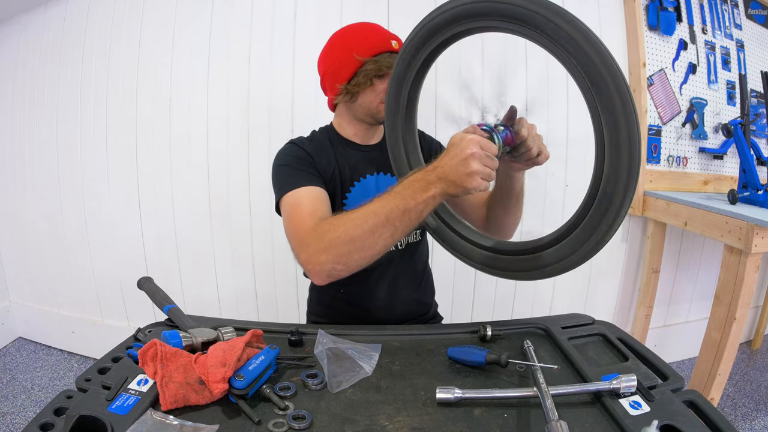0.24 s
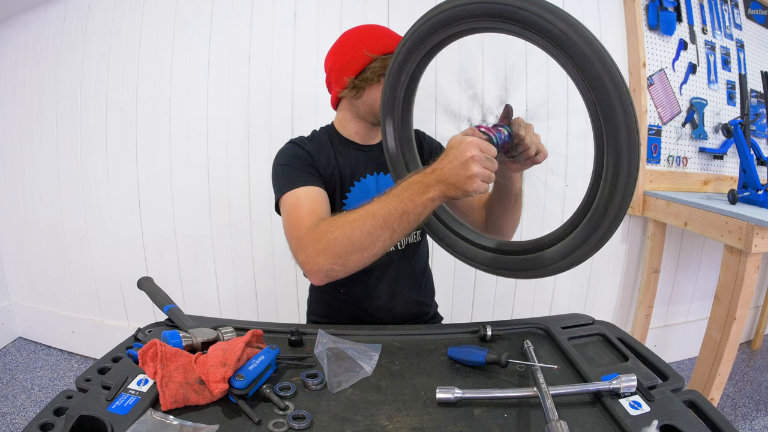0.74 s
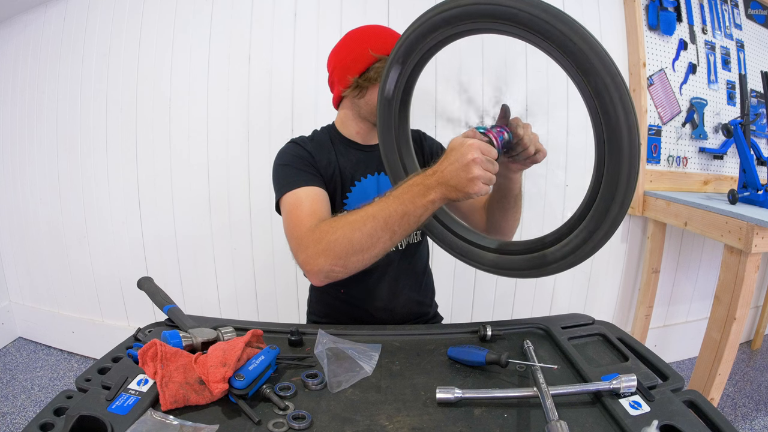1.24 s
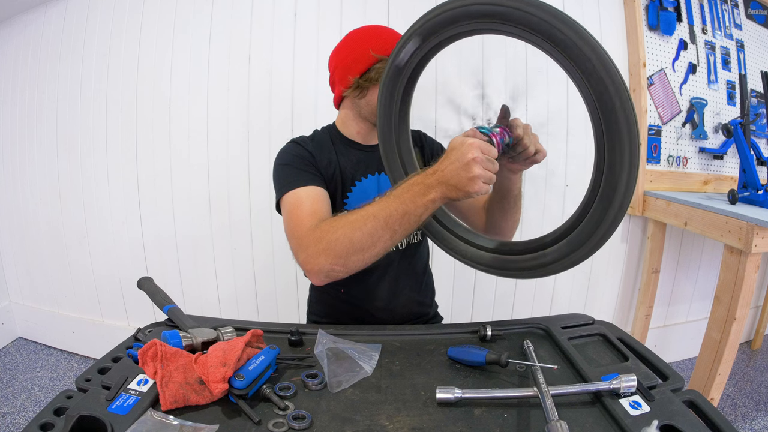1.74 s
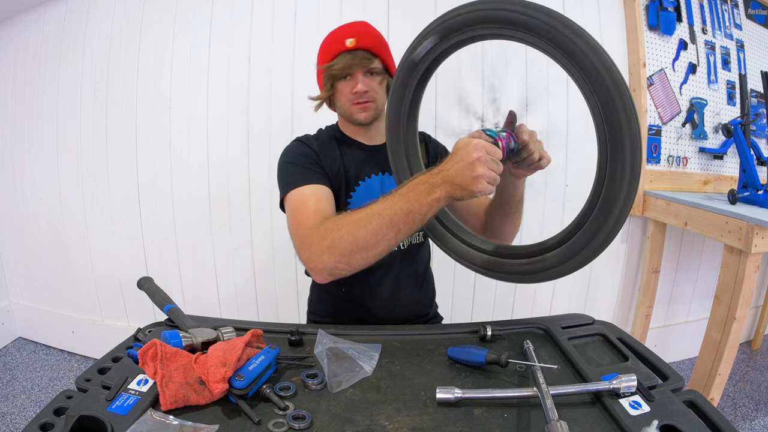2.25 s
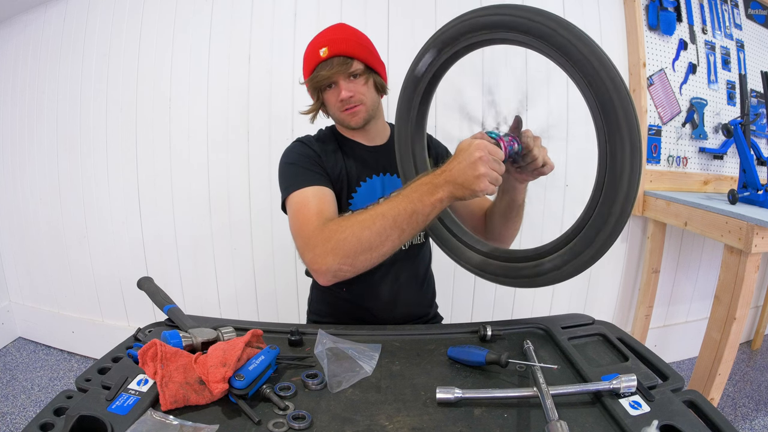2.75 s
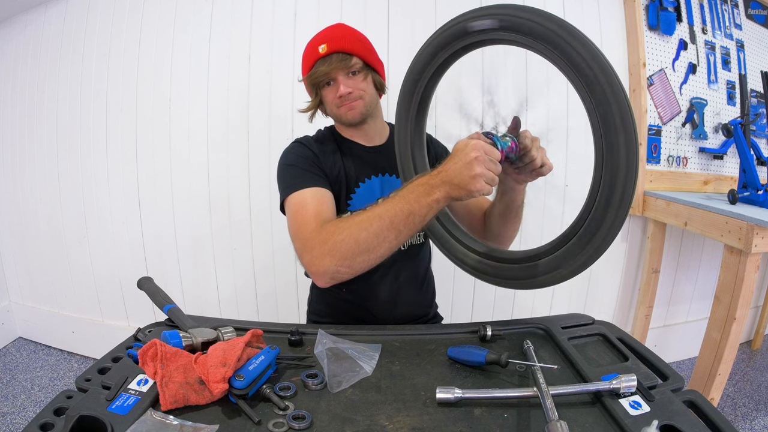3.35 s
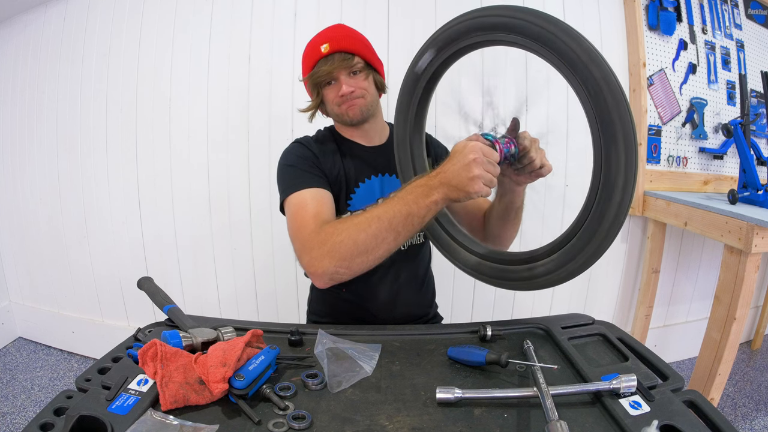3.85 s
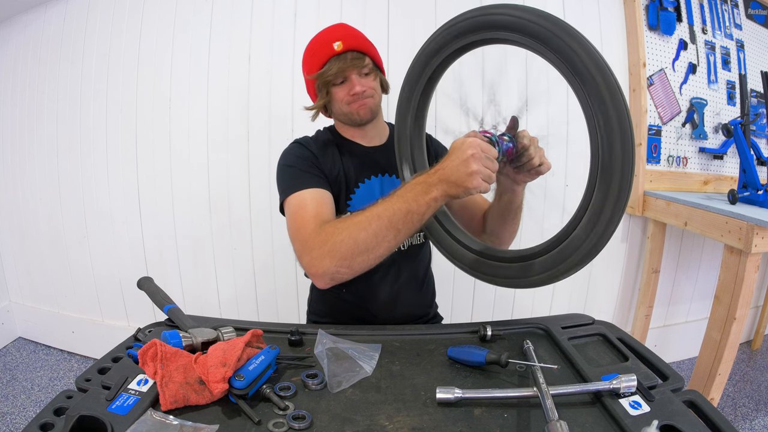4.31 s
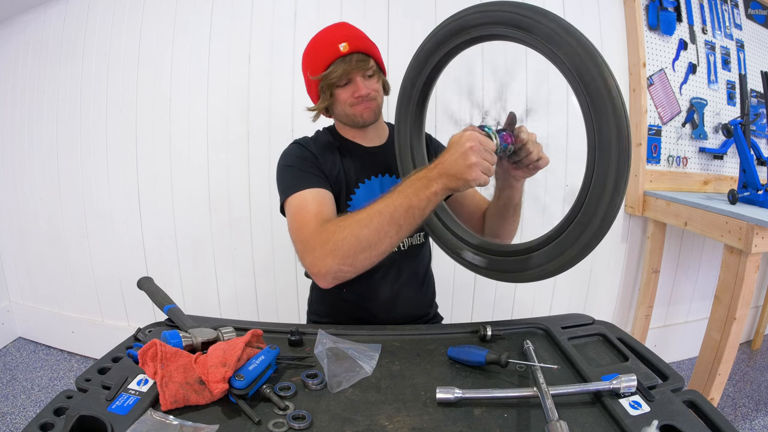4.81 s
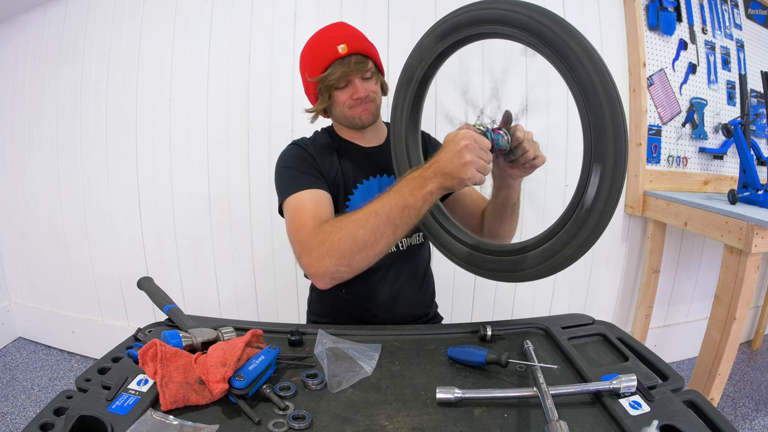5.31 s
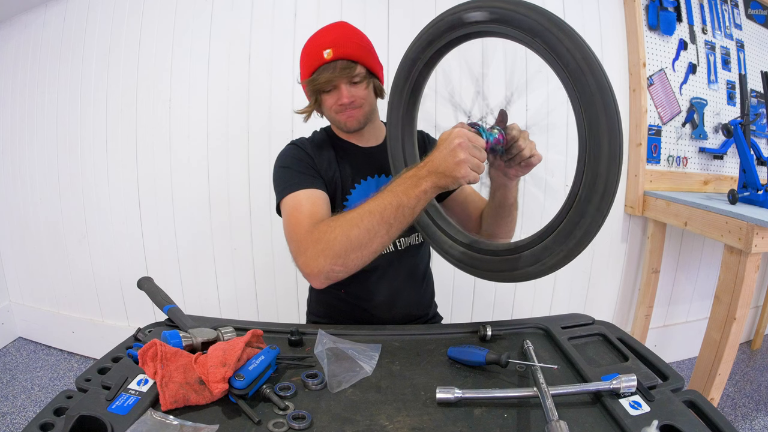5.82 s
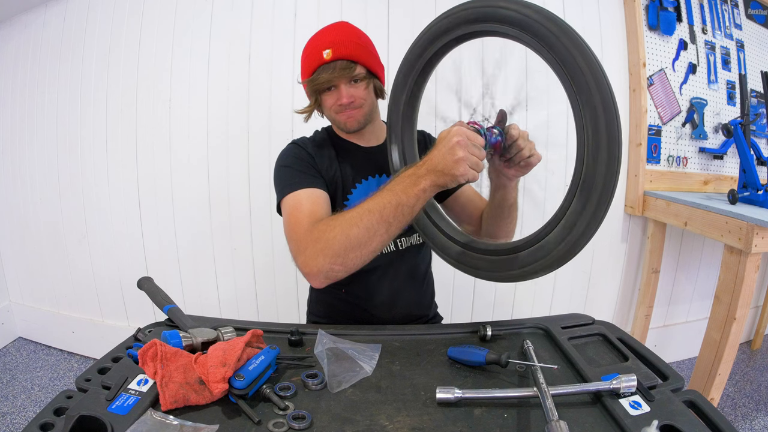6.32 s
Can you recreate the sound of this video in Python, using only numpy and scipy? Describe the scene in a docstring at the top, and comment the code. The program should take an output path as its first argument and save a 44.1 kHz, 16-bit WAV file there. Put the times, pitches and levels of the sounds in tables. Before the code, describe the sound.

A freewheeling bicycle hub buzzes brightly, its very fast ratchet clicks slowly dropping in pitch as the wheel slows.

```python
"""A bright metallic buzz, slowly falling in pitch: a bicycle wheel freewheels, held by its axle.
The hub's pawls snap over a ring of 68 teeth, so fast that the clicks fuse into a tone, and
friction steadily lowers their rate. Every snap excites resonances of hub shell, spokes and rim,
which swell as the wheel turns. A small workshop adds short reverberation, faint air and hum."""
import sys
import numpy as np
from scipy import signal
from scipy.fft import rfft, irfft, next_fast_len
from scipy.io import wavfile
from scipy.ndimage import uniform_filter1d

SR = 44100
rng = np.random.default_rng(int(sys.argv[2]) if len(sys.argv) > 2 else 0)


def put_to_file(sound):
    """Save the sound as 16-bit audio at rate SR, in the file named by the first command-line argument."""
    columns = np.atleast_2d(sound).T  # one column per channel
    safe = np.clip(columns, -1, 1)
    whole_steps = np.round(safe * 32767)
    wavfile.write(sys.argv[1], SR, whole_steps.astype(np.int16))


N = 289704
TIME = np.arange(N) / SR
FREQS = np.fft.rfftfreq(N, 1 / SR)
TEETH = 68


def gain_of(db):
    """Amplitude ratio of a level: a factor of ten per 20 dB."""
    return 10 ** (np.asarray(db) / 20)


def unit_rms(x):
    """Normalisation to a mean power of 1."""
    return x / np.sqrt(np.mean(x ** 2) + 1e-20)


def levelled(x, size=6000):
    """Division by the running rms steadies the level and keeps the quick flutter."""
    power = uniform_filter1d(uniform_filter1d(x ** 2, size), size // 2)
    return x / np.sqrt(power + 1e-20)


def curve_at(points, hz):
    """Interpolation of a table on a logarithmic frequency axis."""
    f, value = np.transpose(points)
    return np.interp(np.log(hz + 1), np.log(f + 1), value)


def drift(rate_hz):
    """Low-passed noise: a slow random fluctuation of rms 1."""
    return unit_rms(irfft(rfft(rng.standard_normal(N)) / (1 + (FREQS / rate_hz) ** 4), N))


def lobes(turns, crest, count):
    """Directivity of a rotating source: count maxima per turn, one at the share crest of the turn."""
    return np.cos(2 * np.pi * count * (turns - crest))


def tooth_rate(start_hz=159.4, slowing_hz_per_s=10.5):
    """Constant friction torque: the number of teeth passing per second falls linearly."""
    return start_hz - slowing_hz_per_s * TIME


def background(air_db=-63.5):
    """Superposition of a line spectrum, the electrical hum, and a continuous one, the room air."""
    # mains harmonics: f/Hz, rms level/dB
    harmonics = [(60, -79), (120, -85), (360, -73)]
    # spectral density of the still air: f/Hz, relative level/dB
    air_spectrum = [(20, -7.5), (30, -4.5), (45, -19), (80, -3.5), (130, -12), (220, -3.5), (300, -9),
                    (600, -3.5), (4000, -25.5)]
    hum = sum(np.sqrt(2) * gain_of(db) * np.sin(2 * np.pi * (hz * TIME + rng.random()))
              for hz, db in harmonics)
    air = irfft(rfft(rng.standard_normal(N)) * gain_of(curve_at(air_spectrum, FREQS)), N)
    return hum + gain_of(air_db) * unit_rms(air)


def room_tail(gap_s=0.003, size=16384):
    """Impulse response of a diffuse field: noise decaying exponentially, each band at its own rate."""
    # reverberation time of the workshop: f/Hz, T60/s
    decay_times = [(300, 0.74), (2000, 0.55), (7000, 0.38), (15000, 1)]
    # reverberation relative to the direct sound: f/Hz, level/dB
    wet_levels = [(400, -3), (900, 4), (2200, 3), (4500, 3), (8000, 6.5), (15000, 7.5)]
    hz, t, noise = signal.stft(rng.standard_normal(size), SR, nperseg=256)
    fade = gain_of(-60 * t / curve_at(decay_times, hz)[:, None])
    energy = size * np.mean(fade ** 2, axis=1, keepdims=True)
    fade *= gain_of(curve_at(wet_levels, hz))[:, None] / np.sqrt(energy)
    tail = signal.istft(noise * fade, SR, nperseg=256)[1]
    return np.concatenate([np.zeros(round(gap_s * SR)), tail])


def workshop(direct, turns, orders=3):
    """Rotating directivity: the wheel's lobes sweep the walls, so the reflections vary through a turn."""
    wet = np.zeros(N)
    for order in range(1, orders + 1):
        for facing in (np.cos, np.sin):
            tail = room_tail()
            beam = direct * facing(2 * np.pi * order * turns)
            beam = np.pad(beam, (len(tail) - 1, 0), "wrap")  # the room is already ringing
            wet += signal.oaconvolve(beam, tail, "valid")
    return direct + wet / np.sqrt(orders)


def thin_rings(drive, turns, crest=0.76):
    """Resonance: lightly damped modes sing as harmonics slide through them, and throb as they turn."""
    # narrow modes of hub, rim and spokes: f/Hz, width/Hz, rms level/dB, swells per turn, depth (0-1)
    modes = [(647.4, 9.7, -57.5, 2, 0.2), (796, 7.9, -52, 1, .4), (848.3, 13, -51, 1, .4),
             (1644, 20, -58, 3, .3), (2274, 18, -45, 1, 0.45), (4130, 39, -52.5, 2, 0.3),
             (5028, 58, -47.5, 4, 0.5), (12100, 150, -55, 2, .5), (13830, 140, -54, 3, .5)]
    out = np.zeros(N)
    for hz, width, db, swells, depth in modes:
        ring = signal.lfilter(*signal.iirpeak(hz, hz / width, SR), drive)
        throb = 1 + depth * lobes(turns, crest, swells)
        out += gain_of(db) * unit_rms(ring * throb)
    return out


def radiate(body, turns, waver_hz=6.5):
    """Amplitude modulation: each part radiates one band, whose level follows speed and wheel angle."""
    # rows for spokes, rim, hub shell, pawls: level at mid speed/dB, rise per doubling of speed/dB,
    # swell/dB, its crest/turn, ripple/dB, its crest/turn, random waver/dB
    parts = [(-55, 5.5, 0, 0.4, 1, 0.13, 1.7), (-46.5, 0.5, 2, 0.78, 0.5, 0.22, 1.5),
             (-30, 4, 0, 1, 0.14, 0.22, 0.66), (-26.5, 3.5, .2, 0.86, 0.16, 0.098, 0.36)]
    # brief swells of the hub shell's ring: t/s, half length/s, level/dB
    shell_swells = [(0.449, 0.058, 1.5), (.83, .04, 1), (3.13, 0.023, 0.5), (3.874, 0.018, 0.5),
                    (5.268, 0.018, 3)]
    lowpasses = [1 / (1 + (FREQS / edge_hz) ** 40) for edge_hz in (730, 950, 2800)]
    bands = np.diff(lowpasses, axis=0, prepend=0, append=1)
    spectrum = rfft(body)
    doublings = np.log2(tooth_rate() / tooth_rate().mean())
    shell_db = sum(db * np.exp(-((TIME - at) / half_s) ** 2) for at, half_s, db in shell_swells)
    out = np.zeros(N)
    for band, part, brief_db in zip(bands, parts, (0, 0, shell_db, 0)):
        level_db, speed_db, swell_db, swell_crest, ripple_db, ripple_crest, waver_db = part
        turning_db = swell_db * lobes(turns, swell_crest, count=1)
        turning_db += ripple_db * lobes(turns, ripple_crest, count=4)
        db = level_db + speed_db * doublings + turning_db + waver_db * drift(waver_hz) + brief_db
        out += levelled(irfft(spectrum * band, N)) * gain_of(db)
    return out


def speed_colour(x, centre_hz, width_hz, power):
    """Power law of excitation: faster snaps drive one band harder, so it thins as the wheel slows."""
    band = 1 / (1 + (2 * (FREQS - centre_hz) / width_hz) ** 8)
    gain = (tooth_rate() / tooth_rate().mean()) ** power
    return x + irfft(rfft(x) * band, N) * (gain - 1)


def wheel_body(snaps, size=4096):
    """Free vibration: the metal rings after each snap, as a minimum-phase filter of its resonances."""
    # spectral envelope of one snap: f/Hz, relative level/dB
    envelope = [(60, -58.5), (320, -43.5), (520, -33.5), (750, -30.5), (1000, -21), (1400, -10),
                (1800, -4.5), (2150, 4), (2750, -5), (3500, -5), (5600, -10.5), (8000, -7), (10600, -18),
                (15600, -18)]
    # resonances of rim, spokes and hub: f/Hz, width/Hz, level above the envelope/dB
    modes = [(365, 110, 8.5), (426.5, 46, 2.5), (604, 124, 11.5), (832, 200, 21), (1087, 188, 9),
             (1496, 55, 3.5), (1593, 160, 4.5), (2053, 144, 5), (2382, 335, 7), (3013, 130, 5.5),
             (3370, 180, 3.5), (3645, 63, 4.5), (4140, 38, -4), (4870, 180, 2), (7064, 310, 6.5),
             (9150, 180, 4), (10046, 330, 3), (11730, 1830, 5), (13900, 203, 0)]
    hz = abs(np.fft.fftfreq(size, 1 / SR))
    peaks_db = sum(db / (1 + (2 * (hz - f) / width) ** 2) for f, width, db in modes)
    log_gain = np.log(gain_of(curve_at(envelope, hz) + peaks_db))
    response = np.exp(np.conj(signal.hilbert(log_gain)))  # the Hilbert transform supplies the phase
    ring = np.fft.ifft(response).real
    return signal.oaconvolve(snaps, ring[:size // 2])[:N]


def pawl(teeth, place, knock_db, wear_s=30e-6, jitter_s=28e-6, uneven_db=1.5, chatter_s=0.0027):
    """Impact excitation: a pawl drops off each tooth with a snap, then chatters briefly on the steel."""
    # weight of the chatter against the clean knock: f/Hz, level/dB
    chatter_levels = [(300, -34), (900, -15.5), (1500, -9), (2300, -7), (3500, 1), (7000, 2), (15000, 14)]
    tooth = np.arange(int(teeth[-1]) + 1)
    wear = rng.standard_normal(TEETH)[tooth % TEETH]  # the same faults return with every turn
    jitter, force = rng.standard_normal((N // 200, 2))[tooth].T
    onset_s = np.interp(tooth + place, teeth, TIME) + jitter_s * jitter + wear_s * wear
    onsets = np.clip(np.round(onset_s * SR).astype(int), 0, N - 1)
    knocks = np.bincount(onsets, gain_of(uneven_db * force), N)
    decays = signal.lfilter([1], [1, -np.exp(-1 / (chatter_s * SR))], knocks)
    chatter = decays * rng.standard_normal(N)
    # the clean knock carries the low harmonics, the chatter takes over in the treble
    size = next_fast_len(N)
    ratio = gain_of(curve_at(chatter_levels, np.fft.rfftfreq(size, 1 / SR)))
    blend = gain_of(knock_db) * rfft(unit_rms(knocks), size) + ratio * rfft(unit_rms(chatter), size)
    return irfft(blend / np.hypot(1, ratio), size)[:N]


def scene():
    """Source and filter: the pawls drive the wheel's resonances in the room, alike in both channels."""
    # snaps within one tooth: place/tooth, relative level of the blow/dB, weight of its clean knock/dB
    pawls = [(0.019, 0.5, 0), (.145, -2, -15.5), (0.354, 2.5, -17.5), (0.728, -5, -6)]
    wobble = 0.012 * drift(rate_hz=7)  # the hand-held axle wavers by a small share of a tooth
    teeth = np.cumsum(tooth_rate()) / SR + wobble
    turns = teeth / TEETH
    direct = [gain_of(blow_db) * pawl(teeth, place, knock_db) for place, blow_db, knock_db in pawls]
    snaps = sum(workshop(train, turns) for train in direct)
    body = wheel_body(snaps)
    body = speed_colour(body, centre_hz=1760, width_hz=1040, power=1.0)  # lower modes of the hub shell
    body = speed_colour(body, centre_hz=14100, width_hz=2700, power=0.19)  # the edge of the snaps
    buzz = radiate(body, turns) + thin_rings(sum(direct), turns)
    return np.tile(buzz + background(), (2, 1))


def record(dry, edge_hz=15750):
    """Band limiting: a steep linear-phase low-pass removes the highest treble."""
    lowpass = signal.firwin(1023, edge_hz, window=("kaiser", 9), fs=SR)
    return signal.oaconvolve(dry, lowpass[None], "same")


dry = scene()
out = record(dry)
put_to_file(out)
```